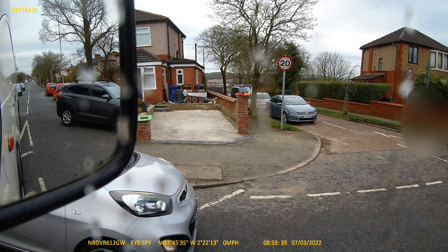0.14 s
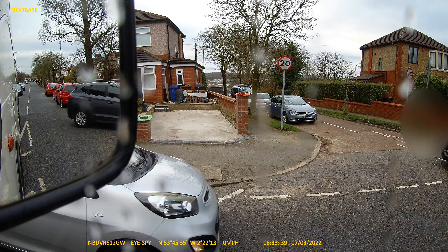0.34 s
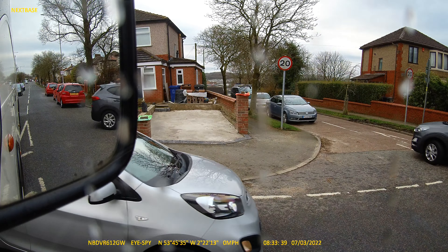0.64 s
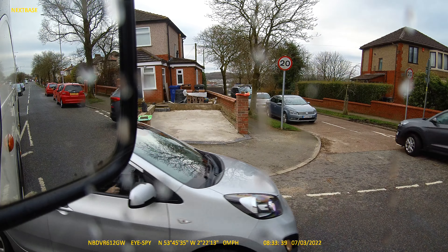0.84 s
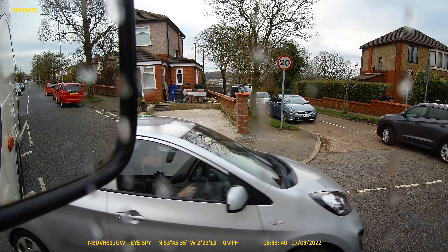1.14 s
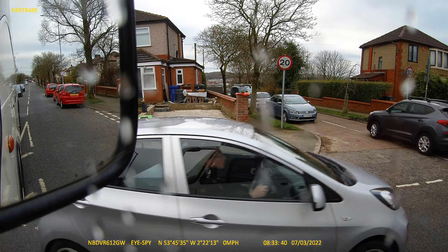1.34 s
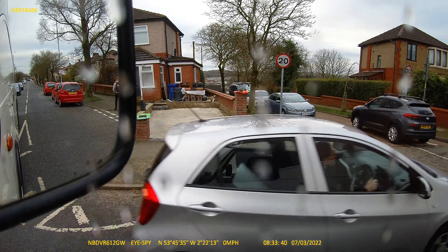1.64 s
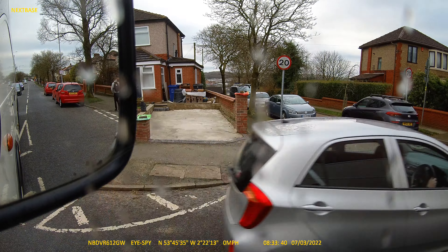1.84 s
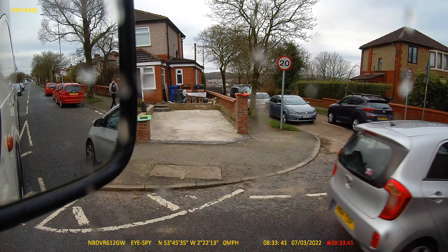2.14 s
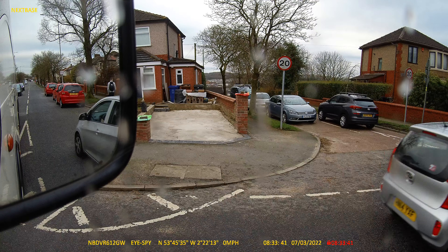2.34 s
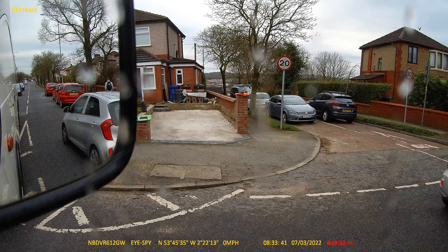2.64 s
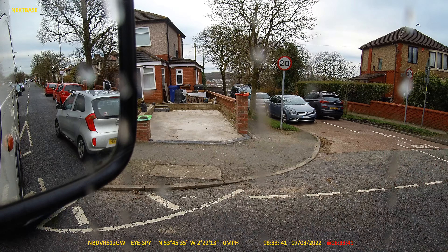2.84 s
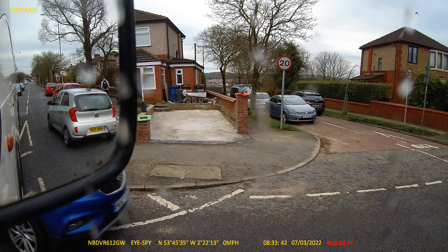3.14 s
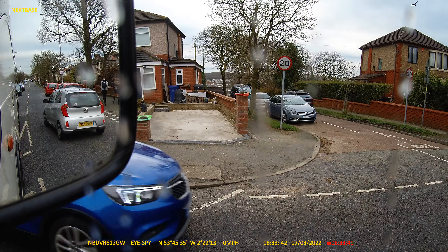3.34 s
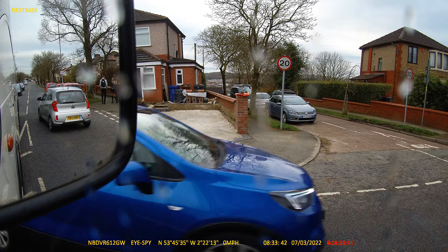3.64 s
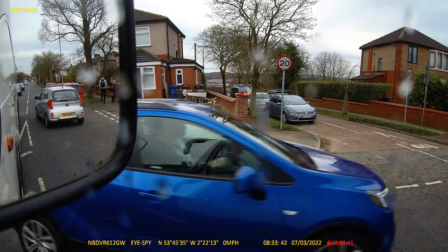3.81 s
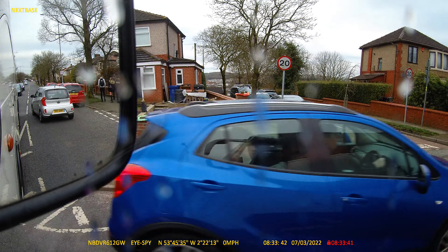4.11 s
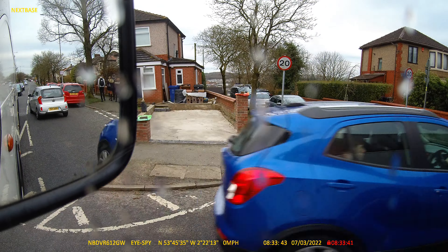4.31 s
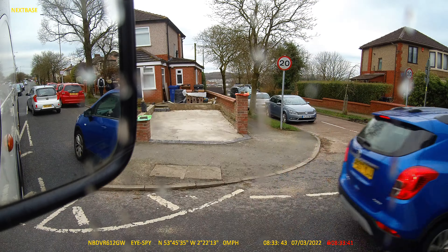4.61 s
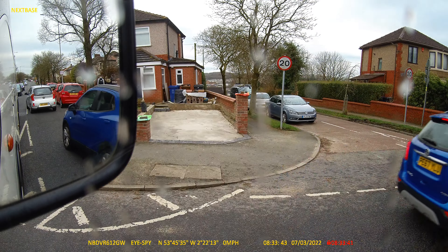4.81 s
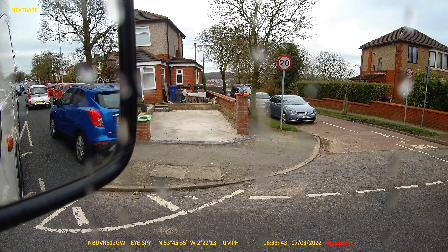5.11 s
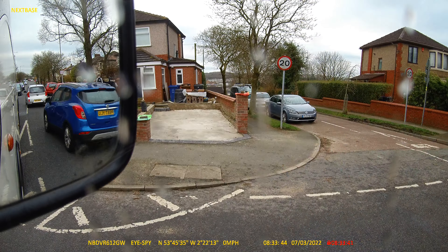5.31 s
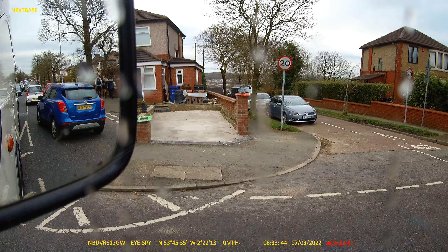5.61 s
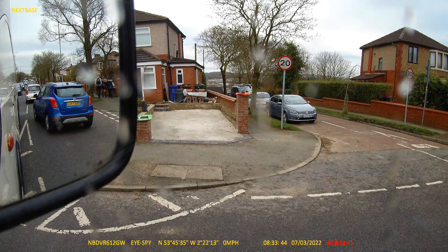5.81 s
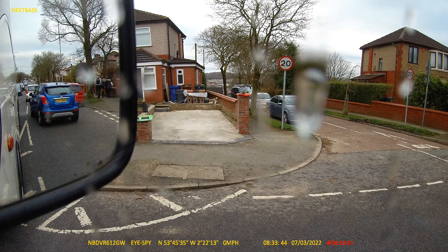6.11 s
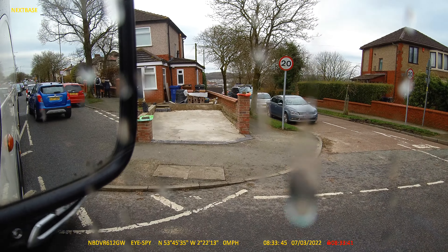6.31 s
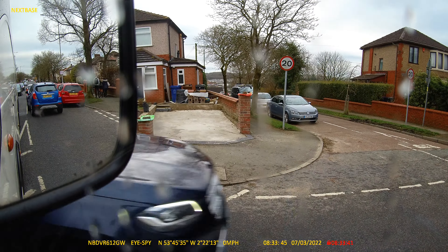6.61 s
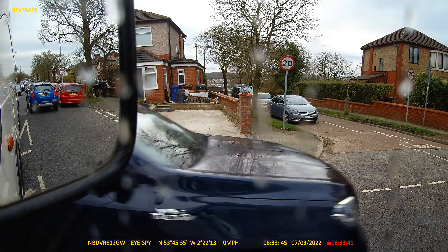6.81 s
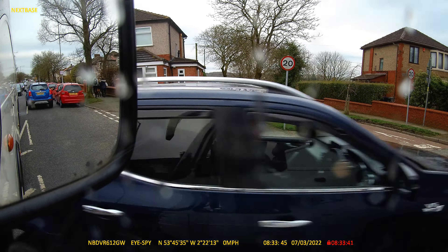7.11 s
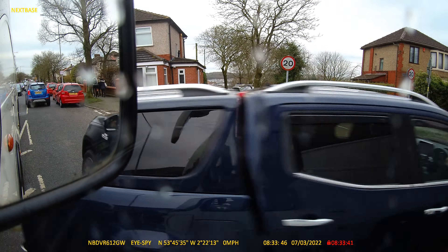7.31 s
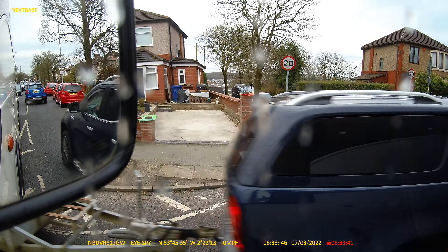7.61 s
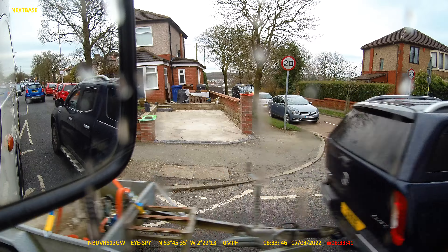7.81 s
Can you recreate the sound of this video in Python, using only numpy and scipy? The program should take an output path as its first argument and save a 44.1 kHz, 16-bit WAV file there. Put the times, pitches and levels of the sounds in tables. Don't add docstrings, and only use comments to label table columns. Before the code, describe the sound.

Inside the cab of a standing coach, close and enclosed, lasting about eight seconds. A large diesel idles throughout as a deep throbbing boom of about thirty pulses a second, beneath a steady heater blower rush with hollow resonances and a very faint, wavering whine. Cars pass outside as muffled tyre rumble, strongest near 0.6, 4, 5.2 and 6.6-7.3 s, with short low exhaust hums, the clearest at 2.7 s. Small crisp ticks on the glass and dashboard come around 1.0, 1.5 and 1.6-1.7 s. From 4.75 s the engine labours, slows and booms louder, lowest near 5.7 s, where loose trim buzzes briefly. It recovers by 6.5 s, quickens slightly and its boom thins at 7.3 s, then returns. At 7.6 s a passing trailer gives a barely audible clank and a swell of low drone; rumble rises again at the end.

```python
import sys
import numpy as np
from scipy import signal
from scipy.fft import rfft, irfft, next_fast_len
from scipy.io import wavfile
from scipy.ndimage import uniform_filter1d, map_coordinates

SR = 44100
rng = np.random.default_rng(int(sys.argv[2]) if len(sys.argv) > 2 else 0)


def volts_from_decibels(level):
    exponent = np.asarray(level, float) / 20
    return 10 ** exponent


def dump(signal):
    limited = np.clip(np.atleast_2d(signal).T, -1, 1)
    pcm = np.round(limited * 32767).astype(np.int16)
    wavfile.write(sys.argv[1], SR, pcm)


N = 350595
T_S = np.arange(N) / SR

# t/s, firing rate/Hz, firing note level/dB
ENGINE = [(0, 30.05, -22), (.4, 30.01, -22), (.75, 29.98, -23.2), (2.4, 29.975, -23.4),
          (3.65, 29.975, -22.3), (4.1, 29.96, -23), (4.6, 29.99, -21.5), (4.9, 29.58, -21),
          (5.2, 28.39, -20.5), (5.45, 28.04, -20.2), (5.75, 27.97, -19.8), (6.05, 29.22, -20),
          (6.35, 29.52, -20.5), (6.65, 30.25, -22), (6.95, 30.78, -24.5), (7.3, 32.65, -29),
          (7.65, 31.13, -25), (7.95, 31.11, -22.5)]
MULTIPLE_LAGS = [
    (2, -.8),
    (3, -.5),
    (4, 3.1),
]
# idle level/dB, gain under load/dB
MULTIPLE_LEVELS = [
    (-35, 0.6),
    (-52, 4.5),
    (-50.5, 7),
]
# f/Hz, width/Hz, level/dB
PANEL = (330, 7.3, -44)
# t/s, peak level/dB
PASSES = [(.6, -31.5), (1.65, -40), (2.8, -44.5), (4, -35.5), (5.2, -32.5), (6.6, -33), (7.25, -33),
          (7.62, -41), (7.97, -26)]
# f/Hz, density/dB per Hz
RUMBLE = [(4, -120), (10, -8), (18, -1), (30, -5), (42, -2), (51, 2), (60, -3), (74, 0), (88, -9),
          (105, -18), (140, -120)]
# f/Hz, density/dB per Hz
AIR = [(70, -120), (100, -3), (250, -7), (350, -8.5), (500, -13), (600, -17), (700, -18.5), (900, -20.5),
       (1300, -28), (1650, -29.5), (2000, -33), (2400, -37.5), (3000, -36.5), (6500, -40), (7200, -43),
       (15000, -46.5)]
# f/Hz, width/Hz, level over rush/dB
AIR_MODES = [(114, 9.8, 6), (157.4, 16.4, 7), (184, 16, 1.5), (217.4, 27.2, 9.5), (285.5, 44, 12),
             (320, 23, 2.5), (379, 8.5, 6), (415, 34.5, 8), (468, 27.4, 12.5), (490, 14, 6),
             (525, 35, 10.5), (555.7, 19, 11), (619.4, 44, 8), (780, 37, 11.5), (822, 51, 7), (730, 23, 0),
             (948, 16, 1.5), (891, 7.2, -5), (892.4, 13, 12), (987, 25, 5), (1067, 66, -2), (1153, 44, 9.5),
             (1251, 53, 12), (1346, 21, 15), (1390, 26, 21), (1435, 58, 16), (1533, 42, 13.5),
             (1660, 17, 8), (1786, 94, 7), (1852, 30, 4.5),
             (2070, 32, 1), (2155, 33, 1), (2340, 16, 5), (2552, 26, 11.5), (2680, 73, 11),
              (2794, 39, 8.5), (2864, 28, 7.5), (2970, 37, 5), (3086, 54, 6), (3207, 28, 6.5),
              (3345, 29, 4), (3800, 20, 6), (3840, 50, 1), (3980, 12, 3.5), (4154, 46, 4.5),
              (4633, 14, 11.5), (4760, 46, 2), (4700, 76, -2), (5020, 66, 4.5), (5140, 58, 3),
              (5320, 59, 2), (5660, 32, 7), (6030, 82, 1.5), (6240, 17, 9), (6520, 50, -1), (6655, 95, 7.5),
              (6940, 21, 7), (7470, 30, 3.5), (8200, 100, 3.5), (10050, 120, -4)]
# f/Hz, width/Hz
NULLS = [(250, 14.3), (316, 16.7), (386, 16), (487, 17.4), (510, 7.2), (587, 10), (752, 13.3), (800, 4.1),
         (890, 18), (925, 14), (1180, 15), (1290, 24), (1555, 9.3), (1648, 5), (2055, 10), (2250, 20),
         (2415, 12), (2470, 7.2), (2640, 14), (2750, 26), (2950, 21), (3115, 11)]
# t/s, f/Hz, glide/(Hz/s), peak level/dB, time until faded/s
EXHAUSTS = [(.9, 74.6, 2, -43, 0.42), (2.7, 63.85, 44, -26, .2), (2.98, 71.4, 0, -33, 0.23),
            (3.419, 68, -2.5, -36, 0.4), (3.68, 49.5, -10, -35, .4), (3.96, 73.2, 26, -31, .13),
            (7.1, 68.6, 0, -43, 0.56), (7.801, 71.3, 5, -32.5, 0.2)]
# t/s, peak level/dB, centre f/Hz, spread/octaves
TICKS = [(.9601, -37.5, 9000, .5), (.964, -40, 8500, .7), (.987, -36, 7300, .5), (.9871, -43, 4400, .2),
         (1.4623, -34.5, 10000, .45), (1.5101, -34, 4450, .8), (1.5102, -40, 2240, .2),
         (1.5945, -48, 8000, .3), (1.7023, -35, 2080, .2)]
PANE_HZ = [2170, 4450, 6400, 7500, 8400, 10200, 12400, 14400]
# start f/Hz, end f/Hz, loss/dB
BAND_EDGE = (15000, 15250, -45)

LOAD_ON_S, LOAD_OFF_S, LOAD_RAMP_S = 4.75, 6.95, .15
BUZZ_S, BUZZ_DB, BUZZ_WIDTH_S = 5.73, -46, .125
ROAD_DB, PASS_DB_PER_S = -42, 18
EXHAUST_FADED_DB = 10
BLOWER_DB, DRONE_TOP_HZ = -33.0, 450
TRAILER_S, RISE_S, FALL_S = 7.62, 0.13, 0.36
TRAILER_DRONE_DB, LOAD_DRONE_DB = 5.5, 0.3
BLADE_HZ, BLADE_SAG, BLADE_DB = 1397, 4.5, -53
PANE_T60_S, PANE_DAMPING, SIDE_DB = 0.0067, 0.76, -4
JOLT_S, JOLT_WIDTH_S, JOLT_DB = 7.605, .025, -57


def unit(x):
    return x / np.sqrt(np.mean(x ** 2) + 1e-20)


def curves(rows):
    t_s, *columns = np.transpose(rows)
    return [np.interp(T_S, t_s, column) for column in columns]


def wobble(rate_hz):
    knots = rng.standard_normal(int(N * rate_hz / SR) + 4)
    return map_coordinates(knots, [np.arange(N) * rate_hz / SR])


def sine(hz):
    return np.sqrt(2) * np.sin(2 * np.pi * np.cumsum(hz) / SR)


def rush(spectrum, modes=(), nulls=(), ripple_db=0):
    m = next_fast_len(N + 8192)
    hz = np.fft.rfftfreq(m, 1 / SR)
    f_hz, density_db = np.transpose(spectrum)
    broad_db = np.interp(np.log(hz + 1), np.log(f_hz + 1), density_db)
    lift = 1 + sum(volts_from_decibels(2 * db) / (1 + ((hz - f) / width) ** 2 * 2) ** 2 for f, width, db in modes)
    cut = np.prod([1 - 0.49 / (1 + ((hz - f) / width) ** 2) for f, width in nulls], axis=0)
    ripple = np.tanh(map_coordinates(rng.standard_normal(1200), [hz / 22]))
    ripple *= np.interp(hz, [1800, 2800, 6900, 7300, 11500, 13000], [0, .45, .45, 1, 1, .6])
    gain = volts_from_decibels(broad_db + ripple_db * ripple) * np.sqrt(lift) * cut
    return unit(irfft(rfft(rng.standard_normal(m)) * gain, m)[:N])


def click(hz, t60_s, noisy):
    t = np.arange(SR // 20) / SR
    burst = uniform_filter1d(rng.standard_normal(len(t)), size=5)
    smear = noisy * burst * volts_from_decibels(-60 * t / .003)
    attack = 1 - np.exp(-t / 0.00012)
    return np.sin(2 * np.pi * hz * t) * (volts_from_decibels(-60 * t / t60_s) + smear) * attack


def load():
    on = 1 / (1 + np.exp((LOAD_ON_S - T_S) / LOAD_RAMP_S))
    return on / (1 + np.exp((T_S - LOAD_OFF_S) / LOAD_RAMP_S))


def firing_boom(hz, boom_db, turn):
    uneven = 1 + .08 * np.cos(turn / 2) + .03 * np.cos(turn / 3)
    sound = volts_from_decibels(boom_db + .3 * wobble(7)) * uneven * np.cos(turn)
    for (multiple, lag_rad), (idle_db, load_db) in zip(MULTIPLE_LAGS, MULTIPLE_LEVELS):
        level_db = idle_db + load_db * load() + 1.5 * wobble(4)
        sound += volts_from_decibels(level_db) * np.cos(multiple * turn + lag_rad + 0.37 * wobble(5.1))
    return np.sqrt(2) * sound


def pump_panel(firing_hz):
    centre_hz, width_hz, panel_db = PANEL
    pump_hz = 11.015 * firing_hz
    near = 1 / (1 + ((pump_hz - centre_hz) / width_hz) ** 4)
    phase = 2 * np.pi * np.cumsum(pump_hz + 0.807 * wobble(2.96)) / SR
    return np.sqrt(2) * volts_from_decibels(panel_db + 0.64 * wobble(3.03)) * near * np.cos(phase)


def trim_buzz(turn):
    sound = np.zeros(N + SR)
    size = volts_from_decibels(BUZZ_DB - ((T_S - BUZZ_S) / BUZZ_WIDTH_S) ** 2)
    for i in np.flatnonzero(np.diff(np.floor(turn / (2 * np.pi) + .21))):
        hit = click(rng.uniform(7600, 8000), 0.0049, noisy=1.5)
        hit += 1.05 * click(2700, 0.0052, noisy=1.5)
        hit += .6 * click(5000, .003, noisy=1.5)
        hit += .7 * click(10300, .003, noisy=1.5)
        sound[i:i + len(hit)] += size[i] * volts_from_decibels(rng.normal(0, 1.8)) * hit
    return sound[:N]


def engine():
    hz, boom_db = curves(ENGINE)
    turn = 2 * np.pi * np.cumsum(hz) / SR + 1.2 + .08 * wobble(2.5)
    return firing_boom(hz, boom_db, turn) + pump_panel(hz) + trim_buzz(turn)


def tyre_rumble():
    power = volts_from_decibels(2 * ROAD_DB)
    for pass_s, peak_db in PASSES:
        power = power + volts_from_decibels(2 * (peak_db - PASS_DB_PER_S * abs(T_S - pass_s)))
    return np.sqrt(power) * unit(volts_from_decibels(0.74 * wobble(5.6)) * rush(RUMBLE))


def blower():
    air = rush(AIR, AIR_MODES, NULLS, ripple_db=4.0)
    drone = signal.sosfilt(signal.butter(2, DRONE_TOP_HZ, fs=SR, output="sos"), air)
    since_s = T_S - TRAILER_S
    trailer = np.exp(-(since_s / np.where(since_s < 0, RISE_S, FALL_S)) ** 2)
    swell_db = TRAILER_DRONE_DB * trailer + LOAD_DRONE_DB * load()
    return volts_from_decibels(BLOWER_DB) * (air + (volts_from_decibels(swell_db) - 1) * drone)


def blades():
    sag = np.clip(ENGINE[0][1] - curves(ENGINE)[0], 0, None)
    hz = BLADE_HZ - BLADE_SAG * sag + 2.5 * wobble(4) + 3 * wobble(25)
    return volts_from_decibels(BLADE_DB + 2.5 * wobble(6)) * sine(hz)


def exhausts():
    sound = np.zeros(N)
    for peak_s, hz, glide, peak_db, faded_s in EXHAUSTS:
        since_s = T_S - peak_s
        level_db = peak_db - EXHAUST_FADED_DB * (since_s / faded_s) ** 2 + 0.39 * wobble(48)
        phase = 2 * np.pi * (hz + glide * since_s / 2) * since_s
        sound += np.sqrt(2) * volts_from_decibels(level_db) * np.sin(phase)
    return sound


def pane_ring(hz):
    return click(hz, PANE_T60_S * (PANE_HZ[0] / hz) ** PANE_DAMPING, noisy=1.0)


def ticks():
    sound = np.zeros(N + SR)
    for t_s, peak_db, centre_hz, spread in TICKS:
        modes = 0
        for hz in PANE_HZ:
            weight = np.exp(-(np.log2(hz / centre_hz) / spread) ** 2 / 2)
            modes = modes + weight * pane_ring(hz)
        hit = volts_from_decibels(peak_db) * (pane_ring(centre_hz) + volts_from_decibels(SIDE_DB) * modes)
        sound[round(t_s * SR):][:len(hit)] += hit
    return sound[:N]


def trailer_jolt():
    envelope = np.exp(-((T_S - JOLT_S) / JOLT_WIDTH_S) ** 2)
    return volts_from_decibels(JOLT_DB) * envelope * rush([(1500, -40), (2000, 0), (2600, 0), (3600, -40)])


def scene():
    steady = engine() + tyre_rumble() + blower() + blades()
    return (steady + exhausts() + ticks() + trailer_jolt())[None]


def roll_off(x):
    return signal.sosfilt(signal.butter(12, 15760, fs=SR, output="sos"), x)


def record(dry):
    m = next_fast_len(N + 4096)
    start_hz, end_hz, loss_db = BAND_EDGE
    edge = volts_from_decibels(np.interp(np.fft.rfftfreq(m, 1 / SR), [start_hz, end_hz], [0, loss_db]))
    fade_in = np.clip(T_S / .003, 0, 1)
    mix = irfft(rfft(dry * fade_in, m) * edge, m)[:, :N]
    return roll_off(mix)


dry = scene()
out = record(dry)
dump(out)
```